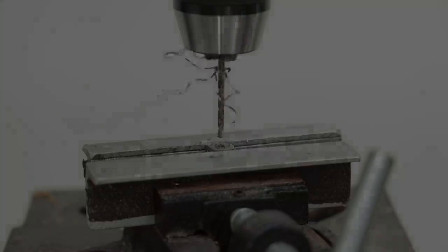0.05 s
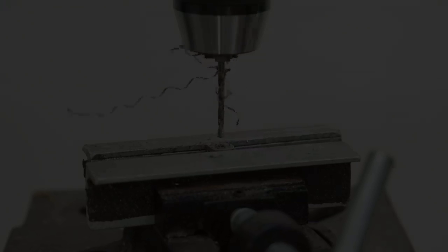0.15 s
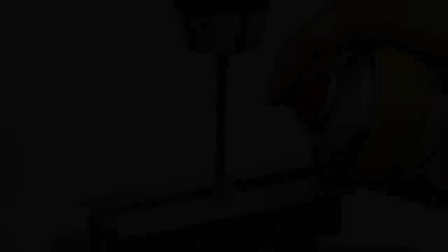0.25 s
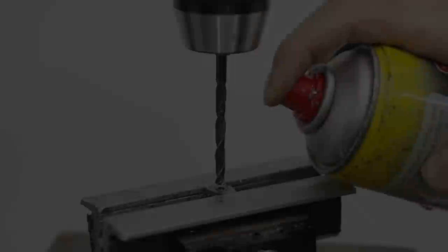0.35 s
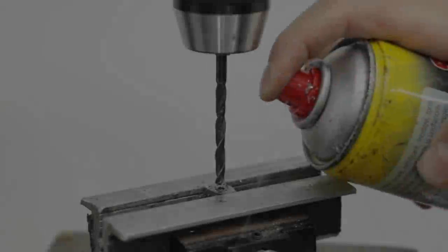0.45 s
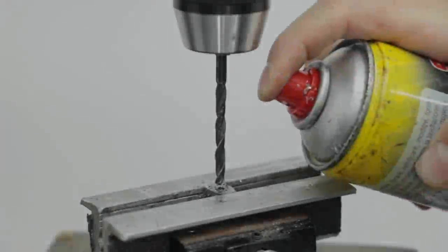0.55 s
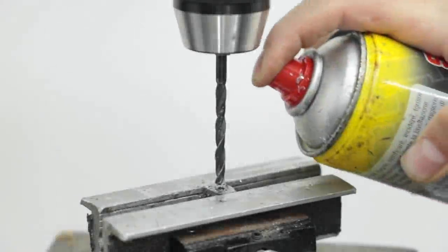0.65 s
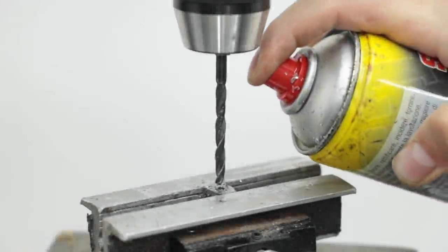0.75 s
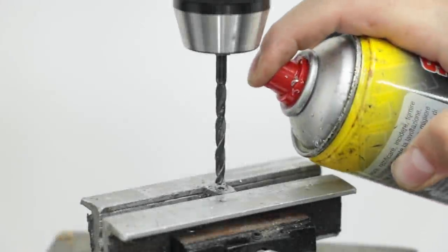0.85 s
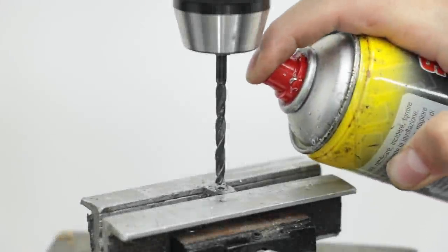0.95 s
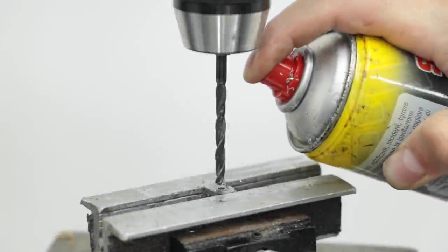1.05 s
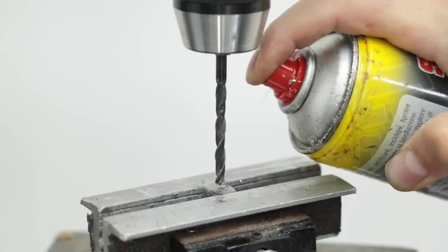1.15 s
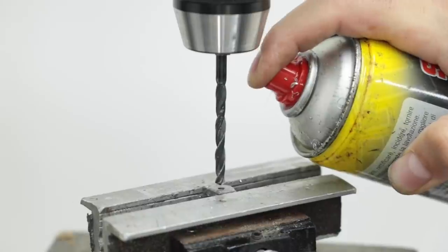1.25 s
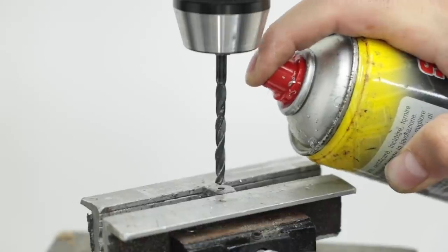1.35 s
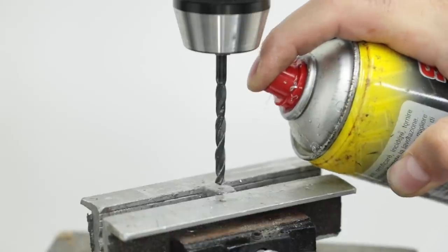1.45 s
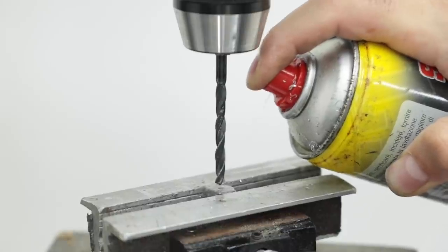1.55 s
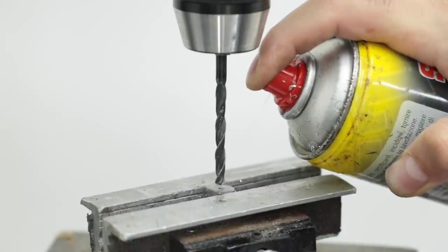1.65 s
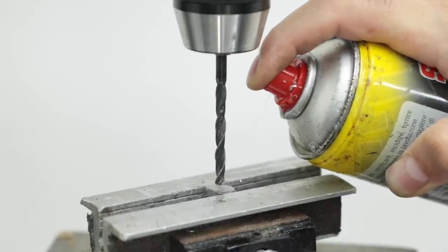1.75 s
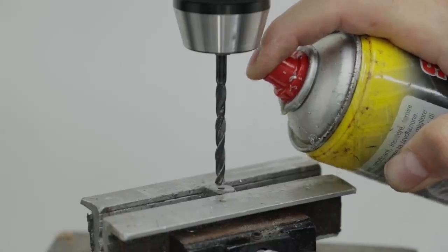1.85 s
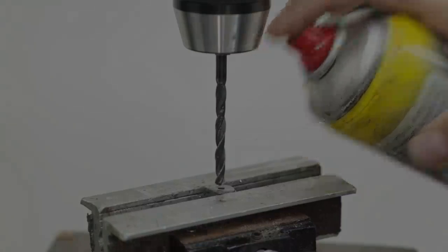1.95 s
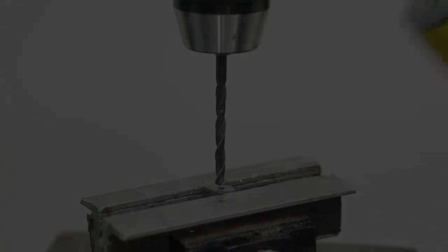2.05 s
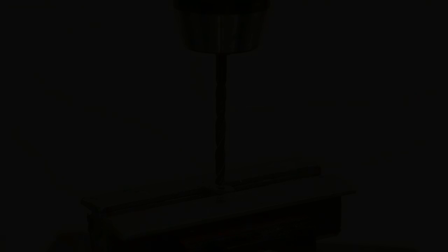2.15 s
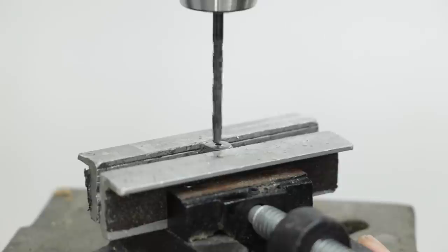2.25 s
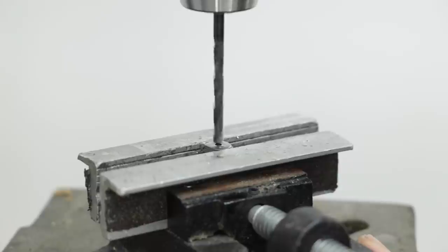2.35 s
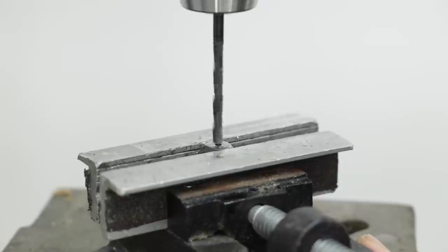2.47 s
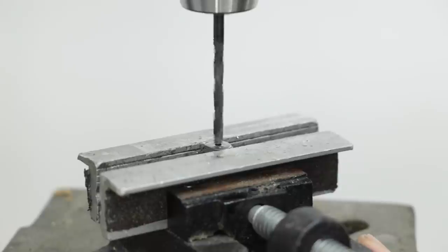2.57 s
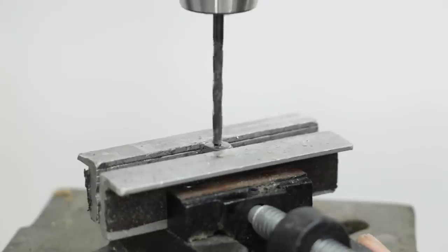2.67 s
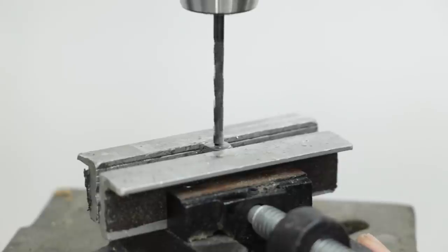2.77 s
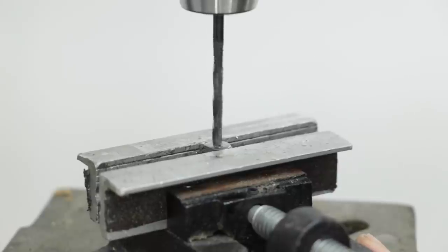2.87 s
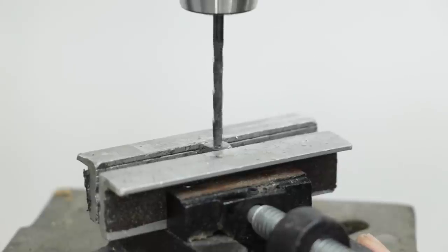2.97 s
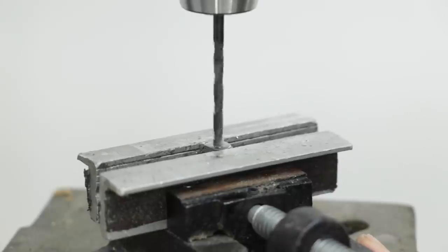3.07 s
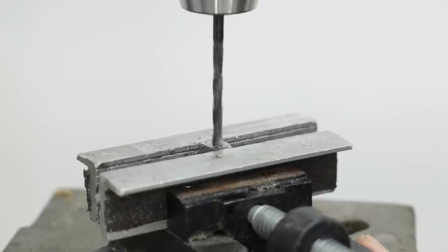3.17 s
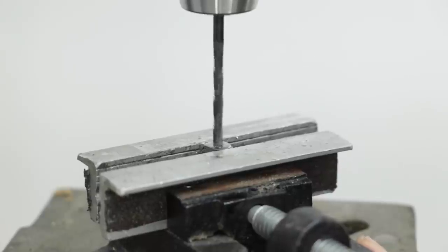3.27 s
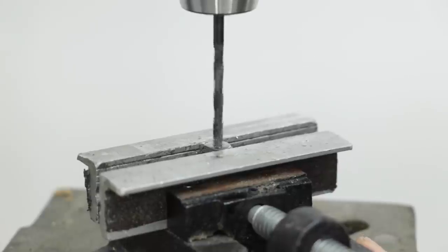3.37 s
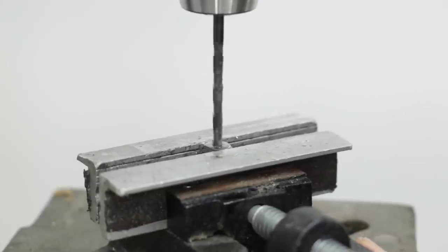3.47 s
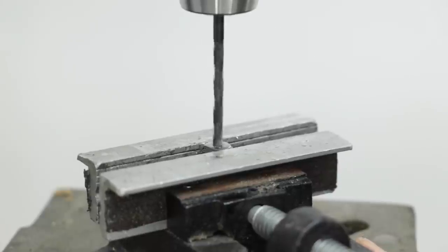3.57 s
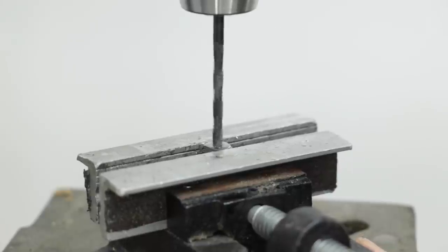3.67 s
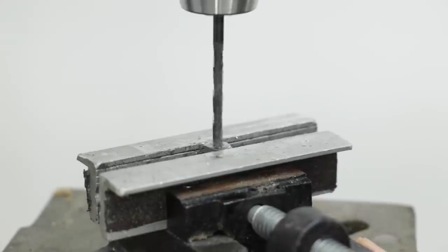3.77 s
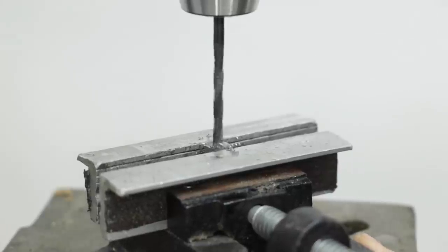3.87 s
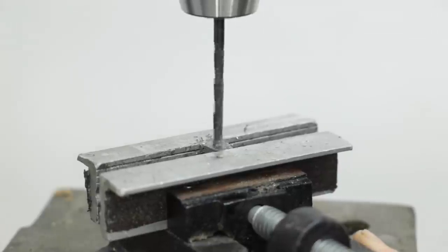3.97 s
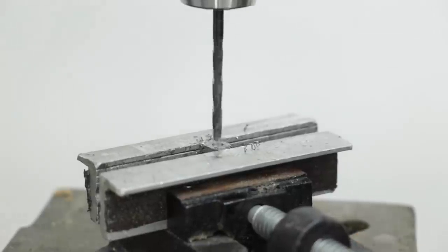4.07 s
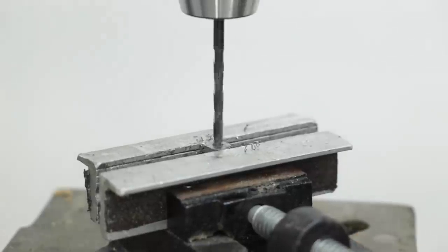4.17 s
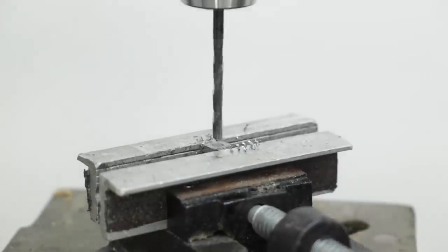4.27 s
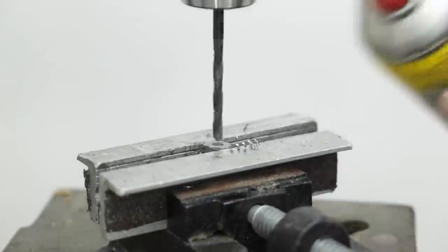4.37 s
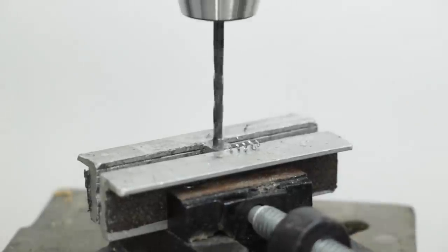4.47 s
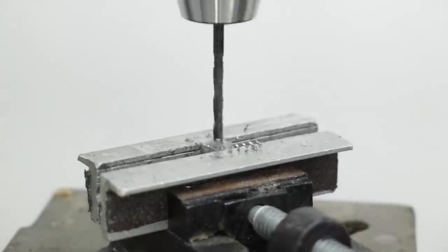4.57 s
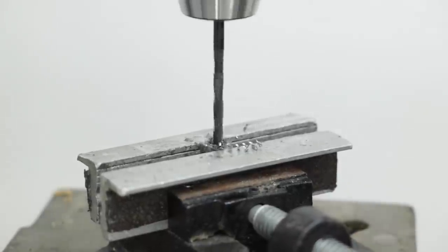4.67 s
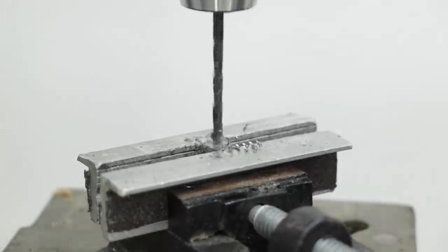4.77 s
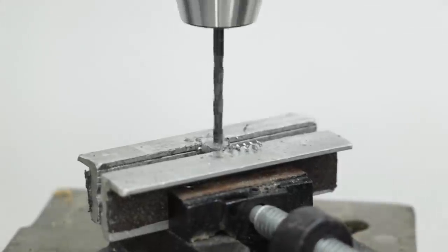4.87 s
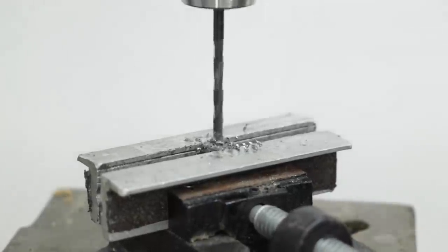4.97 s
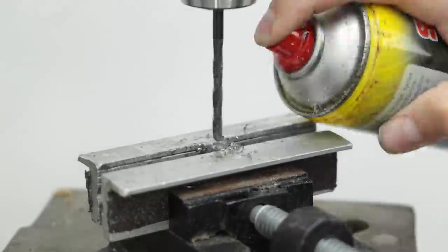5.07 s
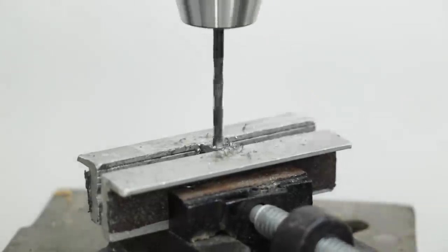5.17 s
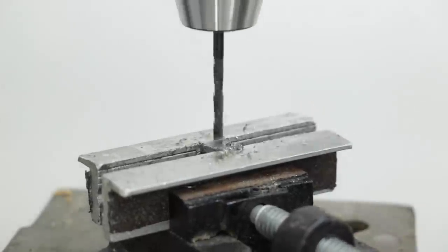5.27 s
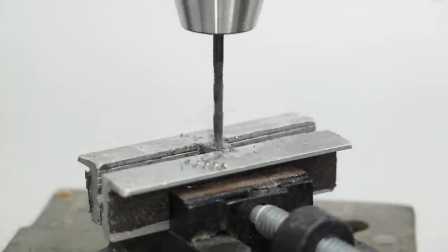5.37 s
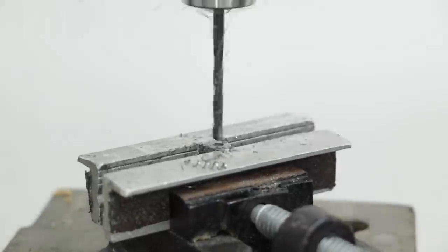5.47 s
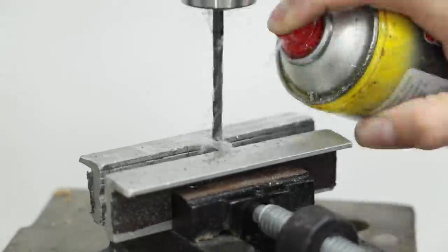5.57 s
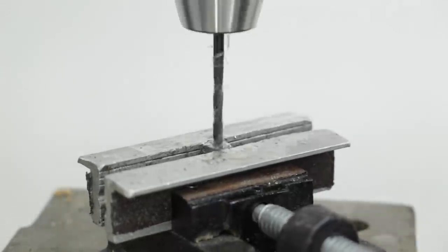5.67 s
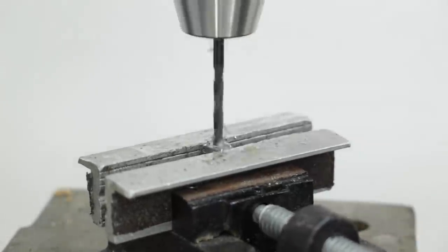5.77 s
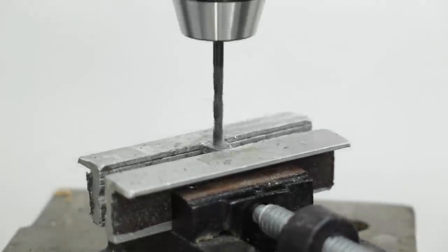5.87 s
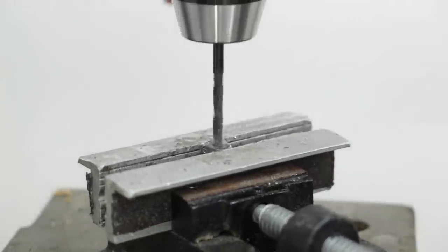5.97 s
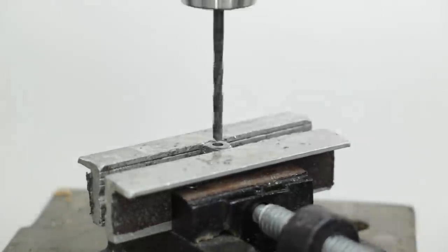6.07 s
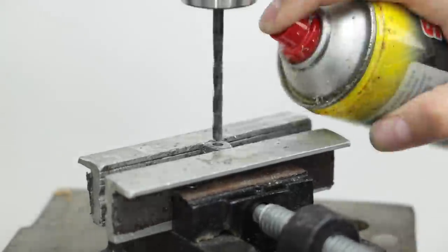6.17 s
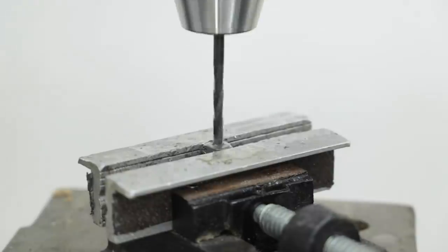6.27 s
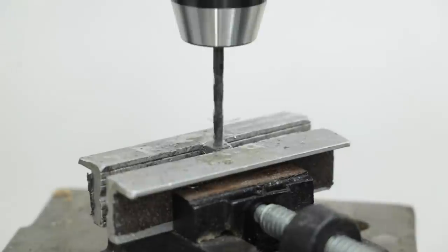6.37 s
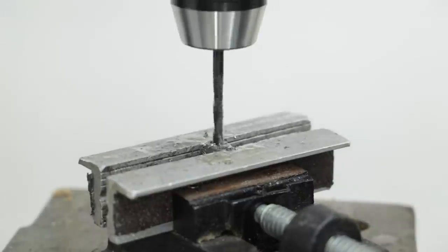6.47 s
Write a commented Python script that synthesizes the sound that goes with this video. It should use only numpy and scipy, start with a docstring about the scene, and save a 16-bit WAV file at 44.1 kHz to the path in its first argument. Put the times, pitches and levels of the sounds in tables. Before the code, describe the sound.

Oil spray hisses in bursts in a small workshop, a drill press rattles and knocks, then a bit shaves steel with ringing hiss and brief squeals.

```python
"""Drill press in a small workshop

A thud dies away on the bench, then five squirts of cutting oil hiss from an aerosol can as filtered turbulence noise;
two of them whistle across the hole like air across a pipe. The press runs, rumbling and knocking once a motor turn
through resonances of its head; then the bit is heard close up, without echo. Dense micro-fractures of the steel bar
give a gritty, ringing hiss, and stick-slip makes short squeals."""
import sys
import numpy as np
from scipy import signal
from scipy.fft import rfft, irfft, next_fast_len
from scipy.io import wavfile

SR = 44100
rng = np.random.default_rng(int(sys.argv[2]) if len(sys.argv) > 2 else 0)


def dump(signal):
    """Clip the signal to [-1, 1] and save it as 16-bit WAV at the path in sys.argv[1]."""
    limited = np.clip(np.atleast_2d(signal).T, -1, 1)
    pcm = np.round(limited * 32767).astype(np.int16)
    wavfile.write(sys.argv[1], SR, pcm)


N = 287952
T = np.arange(N) / SR
SIZE = next_fast_len(N + SR // 2, real=True) // 2 * 2
HZ = np.arange(SIZE // 2 + 1) * SR / SIZE + 1e-3  # kept above zero for logarithms and division

ROOM_ON, PRESS_ON, CUT_ON = .28, 2.213, 3.831  # start times in s

# Drive of the running press, relative levels: time_s, knock_weight_db, knock_edge_db, rumble_db
DRIVE_LEVELS = [(2.25, -33, -29, -34.5), (2.66, -19.5, -33.5, -34), (2.82, -19, -29.5, -35),
                (3.2, -30, -28.5, -36), (3.3, -35, -33, -33.5), (3.46, -20.5, -32.5, -33),
                (3.8, -21.5, -35.5, -34)]
# Stick-slip chatter of the bit, mean pitch and relative level: start_s, end_s, pitch_hz, level_db
SQUEALS = [(4.267, 4.285, 1865, -31), (4.511, 4.682, 1870, -34), (4.754, 4.806, 1860, -32.5),
           (4.882, 4.976, 1870, -34.5), (5.255, 5.316, 1860, -43), (5.795, 5.845, 1852, -44),
           (5.972, 6.06, 1450, -67), (6.383, 6.46, 1847, -48)]


def undb(db):
    """Decibels to amplitude gain."""
    return 10 ** (np.asarray(db) / 20)


def unit(x):
    """Scale to rms 1."""
    return x / np.sqrt(np.mean(x ** 2))


def noise():
    """Two uncorrelated white noises: middle and side."""
    return rng.standard_normal((2, N))


def grit(spread_db):
    """Impulsive noise: exponential chance in dB makes a few samples far stronger (or weaker, if negative)."""
    excess = np.minimum(rng.exponential(size=N), 7)
    return unit(noise() * undb(spread_db * excess))


def walk(rate):
    """Slow random modulation of rms 1: straight lines between random values, rate of them a second."""
    return unit(np.interp(T * rate, np.arange(N), rng.standard_normal(N)))


def gate(start, end, rise, fall):
    """Exponential build-up from start and decay after end; rise and fall are time constants in s."""
    build_up = 1 - np.exp(-np.maximum(T - start, 0) / rise)
    decay = np.exp(-np.maximum(T - end, 0) / fall)
    return build_up * decay


def colour(points):
    """Minimum-phase response through (Hz, dB) points, by folding the cepstrum onto positive time."""
    hz, db = np.transpose(points)
    log_gain = np.log(undb(np.interp(np.log(HZ), np.log(hz), db)))
    cepstrum = irfft(log_gain)
    causal = 2 * cepstrum[:SIZE // 2] * (np.arange(SIZE // 2) > 0)
    return np.exp(rfft(causal, SIZE))


def modes(rows):
    """Modal superposition: response of damped resonances at (Hz, half-power width Hz, peak dB)."""
    return sum(undb(db) / (1 + 1j * (HZ ** 2 - hz ** 2) / (HZ * width)) for hz, width, db in rows)


def ripple(t60, wet_db):
    """Modal overlap: response of many weak, crowded resonances beside the direct path."""
    t = T[:SR // 8]
    tail = rng.standard_normal(len(t)) * np.exp(-np.log(1000) * t / t60)
    spectrum = rfft(tail, SIZE)
    return 1 + undb(wet_db) * unit(np.abs(spectrum)) * np.exp(1j * np.angle(spectrum))


def through(x, response):
    """Linear filtering by a response scaled to rms gain 1, so that white noise keeps its power."""
    gain = unit(np.abs(response) + 1e-12)
    return irfft(rfft(x, SIZE) * gain * np.exp(1j * np.angle(response)), SIZE)[..., :N]


def stereo(x, side_db, pan_db):
    """Sum and difference of middle and side give left and right; positive pan favours the left."""
    side = undb(side_db) * x[1]
    return np.array([(x[0] + side) * undb(pan_db / 2), (x[0] - side) * undb(-pan_db / 2)])


def workshop(x, t60, wet_db):
    """Diffuse reverberation: the walls return exponentially decaying noise after a gap of 4 ms."""
    t = T[:SR // 2]
    tail = noise()[:, :len(t)] * np.exp(-np.log(1000) * t / t60) * (t > .004)
    tail /= np.sqrt(np.sum(tail ** 2, axis=1, keepdims=True))
    return x + undb(wet_db) * signal.fftconvolve(x, tail, axes=1)[:, :N]


def strikes(rows):
    """Impulsive excitation: one-sample pushes at (s, dB), each with a random share to the side."""
    s, db = np.transpose(rows)
    x = np.zeros((2, N))
    spread = np.array([np.ones(len(s)), rng.standard_normal(len(s))])
    x[:, (s * SR).astype(int)] = undb(db) * spread
    return x


def bench():
    """Impact excites the modes of the table; the can is tapped over the broadband air and low hum of the room."""
    # Soft bumps on the bench, relative level: start_s, level_db
    bump_rows = [(.005, -37), (0.029, -45), (.047, -47), (0.136, -54.5)]
    # Modes of the vice and table: frequency_hz, width_hz, level_db
    table_modes = [(328, 7.5, 0), (315, 53, 10), (460, 33, -14), (565, 18, -10), (900, 70, -34),
                   (1470, 3, -1)]
    # Fingers tapping the can: start_s, level_db
    tap_rows = [(.311, -56.5), (0.428, -55), (.628, -57), (2.025, -63)]
    # Spectrum of the room air: frequency_hz, level_db
    air_spectrum = [(15, -45), (25, -29), (53, -11), (87, -2.5), (120, -5.5), (335, -8.5), (818, -24.5),
                    (1400, -23.5), (1520, -27.5), (2840, -26.5), (16000, -38)]
    thuds = undb(22.0) * through(strikes(bump_rows), modes(table_modes) / (1 + (HZ / 1100) ** 4))
    touch = sum(undb(db) * gate(s, s + 0.0021, 0.0011, 0.003) for s, db in tap_rows)
    taps = through(noise() * touch, modes([(690, 470, 0)]) ** 2)
    air = through(noise(), colour(air_spectrum)) * undb(1.0 * walk(7.9))
    hum_hz = 55 + 2 * walk(8.7)
    hum = undb(-66 + 5.1 * walk(3.6)) * np.sin(2 * np.pi * np.cumsum(hum_hz) / SR)
    # the room is fainter at first and fades out as the press comes in
    presence = gate(ROOM_ON, PRESS_ON, .005, 0.011) + undb(-11.0) * (T < ROOM_ON)
    room = (undb(-62.0) * stereo(air, -2, 0.25) + hum) * presence
    return workshop(stereo(thuds + taps, -23, 0.56), t60=0.27, wet_db=2.0) + room


def crossing(centre, length):
    """Exponential swell up to centre and decay after it; length is the time constant in s."""
    return np.exp(-np.abs(T - centre) / length)


def spray():
    """Turbulent jet noise, droplet impacts a moment later on the steel, and pipe resonance of the blown hole."""
    # Presses of the nozzle: start_s, end_s, jet_db, splash_db
    squirt_rows = [(0.444, 0.535, -41, -42), (0.812, 0.886, -39.5, -42.5), (1.052, 1.096, -38.5, -43),
                   (1.202, 1.311, -40, -39.5), (1.422, 1.868, -43, -39)]
    # The aim wanders in the long squirt: time_s, splash_change_db
    aim_changes = [(1.43, -0.5), (1.525, 2.5), (1.575, -7), (1.77, 3.5), (1.86, 0)]
    # The jet sweeps across the hole: centre_s, swell_s, level_db, pitch_hz, climb_hz_per_s, width_hz
    whistle_rows = [(1.267, 0.014, -28.5, 4080, 2, 220), (1.691, 0.053, -42, 5300, 12502, 520)]
    # Oil spits out of the hole: start_s, level_db
    spit_rows = [(1.268, -23), (1.278, -26)]
    # Spectra of the jet and of the wet splash: frequency_hz, level_db
    jet_spectrum = [(600, -21.5), (1200, -6.5), (1600, -20), (2400, -13), (4000, -9), (6300, -9.5),
                    (7400, -2.5), (8700, -3), (10700, -0.5), (12500, -5.5), (13800, -15.5), (15500, -3)]
    wet_spectrum = [(500, -34), (800, -16), (1220, -1.5), (1550, -7), (2200, 4), (3500, 5), (4800, 1),
                    (8000, 0.5), (10000, -3.5), (15500, 1)]
    hole_hz, hole_width_hz = 3980, 350

    flow, landing = np.zeros(N), np.zeros(N)
    for start, end, jet_db, splash_db in squirt_rows:
        # the nozzle spits before it hisses steadily
        spit = .5 * gate(start, start + 0.0066, 0.0031, 0.014)
        flow += undb(jet_db) * (gate(start, end, 0.0057, 0.017) + spit)
        landing += undb(splash_db) * gate(start + 0.0078, end + 0.0053, 0.014, 0.01)
    landing = landing * undb(np.interp(T, *np.transpose(aim_changes), left=0))

    puffs = sum(undb(db) * gate(s, s + 0.0016, .0005, 0.0026) for s, db in spit_rows)
    whistle = through(noise() * puffs, modes([(hole_hz, hole_width_hz, 0)]) ** 2)
    # each crossing swells, fades and splashes more; the pipe note climbs as oil fills the hole
    for s, length, db, hz, climb, width in whistle_rows:
        eddies = through(noise(), 1 / (1 + (HZ / width) ** 4))
        pitch = hz + climb * np.clip(T - s, -2 * length, 2 * length)
        carrier = np.sqrt(2) * np.sin(2 * np.pi * np.cumsum(pitch) / SR)
        whistle = whistle + undb(db) * crossing(s, length) * eddies * carrier
        landing = landing + undb(db - 8) * crossing(s - .013, length)

    jet = through(noise() * flow, colour(jet_spectrum) * ripple(t60=0.11, wet_db=-12.5))
    droplets = grit(spread_db=0.5) * landing * undb(2.1 * walk(120))
    splash = through(droplets, colour(wet_spectrum) * ripple(t60=0.14, wet_db=-21.5))
    return workshop(stereo(jet + splash, -5.0, -.2) + stereo(whistle, -10, -.3), t60=0.23, wet_db=-6.0)


def knocks(turns):
    """Periodic impact, one a motor turn, softened by belt slack: rows of (s, dB) for weight and edge."""
    belt_hz, tight_s = 7.6, 2.812  # laps of the belt; a time when its stiff part pulls hardest
    slack_db = -11  # change of a knock under the slackest belt
    scatter_db, jitter_s = 3, .0006  # standard deviations in level and time
    weight_lag_s = 0.001993  # the head is pushed this long after the edge first touches
    s = T[1:][(np.diff(np.floor(turns)) > 0) & (T[1:] > PRESS_ON) & (T[1:] < CUT_ON)]
    late, heavy, sharp = rng.standard_normal((len(s), 3)).T
    slack = slack_db * (1 - np.abs(np.cos(np.pi * belt_hz * (s - tight_s))))
    at, weight_db, edge_db, _ = np.transpose(DRIVE_LEVELS)
    s = s + jitter_s * late
    weight = np.c_[s + weight_lag_s, np.interp(s, at, weight_db) + slack + scatter_db * heavy]
    edge = np.c_[s, np.interp(s, at, edge_db) + slack + scatter_db * sharp]
    return weight, edge


def press():
    """Rotating machinery: motor tones and belt rumble, with each turn shaking the head and knocking the loose drive."""
    # Spectra of the rumble and of the clacking edges: frequency_hz, level_db
    rumble_spectrum = [(24, -59.5), (40, -36), (106, -6), (215, -7), (337, 0), (630, -2), (790, -8.5),
                       (942, 1.5), (1210, -6), (1760, -12.5), (2980, -12), (4240, -10.5), (5580, -13.5),
                       (9450, -13.5), (16000, -58)]
    clack_spectrum = [(300, -32.5), (1200, -4.5), (1900, 5.5), (2900, -19), (4300, -1.5), (5600, -4),
                      (6300, -12.5), (9600, -16.5), (10900, -28.5), (12300, -25.5), (13000, -34.5),
                      (15500, -33.5)]
    # Resonances of the head and belt guard: frequency_hz, width_hz, level_db
    head_modes = [(1000, 84, -13.5), (1742, 70, 5.5), (1828, 80, 6), (2016, 74, -2), (2116, 90, -6.5)]
    # Tones of motor, pulleys and bearings, mean pitch and peak level: pitch_hz, level_db
    motor_tones = [(119, -49), (156.5, -47.5), (179, -50), (354, -43.5), (412, -49), (658, -44),
                   (871, -50.5), (935, -47), (965, -50.5), (989, -46), (1136, -54), (1794, -52)]
    turn_hz, in_step_s = 30.0, 2.816  # motor turns; the nominal time of one knock
    slip_at_s, slip_s = 3.27, .0085  # the belt slips once; later knocks are delayed by this much
    running = gate(PRESS_ON, CUT_ON, 0.0061, 0.0033)
    turns = (T - in_step_s - slip_s * (T > slip_at_s)) * turn_hz
    at, _, _, rumble_db = np.transpose(DRIVE_LEVELS)
    shake = unit(np.exp(-(turns % 1) / 0.21) + 0.84) * undb(2.0 * walk(45))
    # part of the clatter comes round again on the next turn: a feedback comb
    repeat = 1 / (1 - .3 * np.exp(-2j * np.pi * HZ / turn_hz))

    rumble_response = colour(rumble_spectrum) * repeat / (1 + (HZ / 2500) ** 4)
    rumble = through(noise() * undb(2.13 * walk(50)), rumble_response)
    tones = np.zeros(N)
    for hz, db in motor_tones:
        phase = 2 * np.pi * np.cumsum(hz + 2 * walk(14)) / SR
        tones += undb(db + 2 * walk(4.7)) * np.sin(phase)
    body = stereo(undb(np.interp(T, at, rumble_db)) * rumble, -13.5, 1.8)
    body = body + stereo([tones, np.zeros(N)], 0, 1.8)

    # the weight of a knock rings the head; its edge chatters for a few ms
    weight, contact = (strikes(rows) for rows in knocks(turns))
    chatter = gate(0, 0.0035, 0.00062, 0.0037)[:SR // 10]
    edge = noise() * signal.fftconvolve(contact[0], chatter)[:N]
    loose = undb(-44.0) * through(grit(spread_db=2.5), repeat) * shake
    rattle = through(loose + undb(16.0) * weight, modes(head_modes) / (1 + (HZ / 2600) ** 8))
    scrape = undb(-42.0) * grit(spread_db=-1.5) * shake
    clack = through(scrape + edge, colour(clack_spectrum) * ripple(t60=.03, wet_db=-5.5))
    clatter = stereo(rattle, -5.5, 1) + stereo(clack, 1.7, 1)
    return running * (body + workshop(clatter, t60=.2, wet_db=-13.5))


def gripping():
    """Stick-slip amplitude: the chatter builds up and lets go exponentially in each squeal."""
    return sum(undb(db) * gate(on, off, 0.021, 0.0073) for on, off, _, db in SQUEALS)


def cut():
    """Brittle fracture: the chip shears off in countless tiny cracks that excite the modes of bit and bar."""
    # Pressure on the bit, relative levels: time_s, hiss_db, ringing_db
    feed_levels = [(3.86, -38.5, -46), (4.22, -36.5, -50.5), (4.98, -34.5, -49.5), (5.01, -36, -56),
                   (5.34, -34.5, -46), (5.64, -35.5, -54), (5.95, -35, -46.5), (6.25, -36, -56.5),
                   (6.5, -34, -45)]
    # Spectra of the shaving hiss and of the table rumble: frequency_hz, level_db
    shaving_spectrum = [(600, -44.5), (1100, -39), (1700, -34.5), (2050, -33.5), (2600, -20.5), (3300, -12),
                        (4200, -15.5), (5200, -7), (6900, 1), (7550, -6.5), (8300, -2), (10300, -7.5),
                        (13000, -0.5), (14200, -17), (15700, -9.5)]
    bed_spectrum = [(18, -40), (30, -6.5), (188, 5), (323, 2.5), (688, -21), (1200, 0.5), (1560, -23),
                    (2640, -120)]
    # Ringing of bit and bar: frequency_hz, width_hz, level_db
    steel_modes = [(1944, 7.7, 1), (2121, 61, -7), (2253, 5.9, -1), (2384, 9.8, 1.5), (3098, 9.5, 6),
                   (3168, 13, 1.5), (3566, 21.5, 3.5), (3740, 27, -3.5), (4620, 24, -0.5), (4910, 20, 0),
                   (5440, 30, -2.5), (6000, 18, -13), (5966, 12, -7), (5970, 15, 0), (7090, 110, 1.5),
                   (8130, 220, -3), (9900, 96, -12), (11270, 23, 4.5), (11700, 120, -2), (12300, 54, 1.5),
                   (12800, 21, -1.5), (13400, 85, 2.5), (14030, 200, -6.5), (14900, 290, -13)]
    node_hz, node_width_hz = 2783, 170
    grip_ring_db = -15.5  # ringing that a squeal adds, against its own level
    bed_share = 1  # extra table rumble in the firmest squeal, as a share of its amplitude
    s, hiss_db, ring_db = np.transpose(feed_levels)
    grip = gripping()

    # the cutting lips bite unevenly and flutter
    flutter = np.zeros(N)
    for hz, depth in [(154, 0.19), (322, 0.044)]:
        flutter += depth * np.sin(2 * np.pi * np.cumsum(hz + 0.72 * walk(1.7)) / SR)
    bite = unit((1 + flutter) * undb(1.0 * walk(45) + 0.88 * walk(500)))
    strain = undb(np.interp(T, s, ring_db) + 9.5) + undb(grip_ring_db) * grip
    # hiss and ringing share one narrow silent band
    node = (1 - modes([(node_hz, node_width_hz, 0)])) ** 2

    hiss_response = colour(shaving_spectrum) * ripple(t60=0.039, wet_db=-1) * node
    hiss = through(grit(spread_db=2.5) * bite, hiss_response) * undb(np.interp(T, s, hiss_db) - 0.53)
    ring_response = modes(steel_modes) * node / (1 + (1600 / HZ) ** 8)
    ring = through(grit(spread_db=4) * bite, ring_response) * strain
    bed = undb(-86.0) * through(noise() * undb(2 * walk(7.6)), colour(bed_spectrum))
    bed = bed * (1 + bed_share * grip / grip.max())
    return gate(CUT_ON, T[-1], 0.0017, .01) * (stereo(hiss + bed, -14.5, 1.1) + stereo(ring, -27, 1.2))


def squeal():
    """Stick-slip locks onto a twisting mode of the bit; a weak grip wavers, a firm one sings clean with overtones."""
    start, end, hz, _ = np.transpose(SQUEALS)
    grip = gripping()
    firm = grip / grip.max()
    pitch = np.interp(T, np.c_[start, end].ravel(), np.repeat(hz, 2))
    pitch = pitch + 4 * walk(25) + (1 - firm) * (16 * walk(30) + 36 * walk(400))
    phase = 2 * np.pi * np.cumsum(pitch) / SR
    harmonics_db = [-1.5, -7.0, -6.5, -21]  # at full grip
    tone = sum(undb(db) * firm ** k * np.sin((k + 1) * phase) for k, db in enumerate(harmonics_db))
    waver = undb(3.5 * (1 - firm) * walk(180) + 0.7 * walk(40))
    return stereo([tone * grip * waver, np.zeros(N)], 0, 2.7)


def scene():
    """Superposition of the sources: oil first, then the running press, then the cut."""
    return bench() + spray() + press() + cut() + squeal()


def record(dry):
    """Band limitation: a steep elliptic low-pass removes the top of the spectrum."""
    top_hz = 15750
    return signal.sosfilt(signal.ellip(10, .2, 75, top_hz, fs=SR, output="sos"), dry)


dry = scene()
out = record(dry)
dump(out)
```